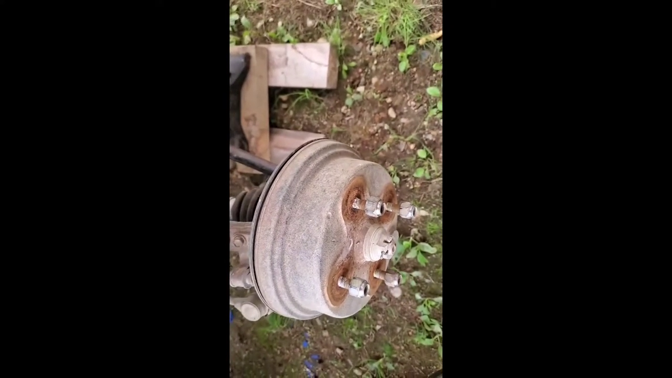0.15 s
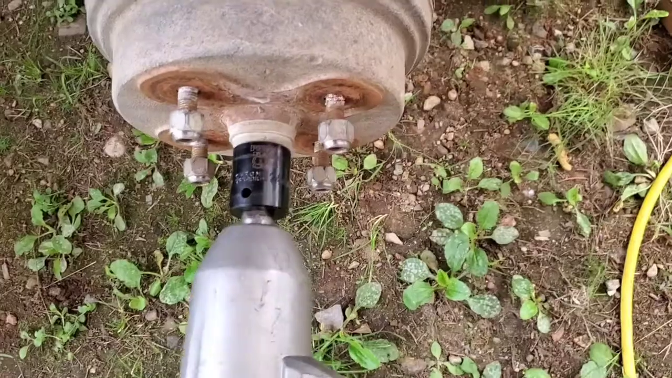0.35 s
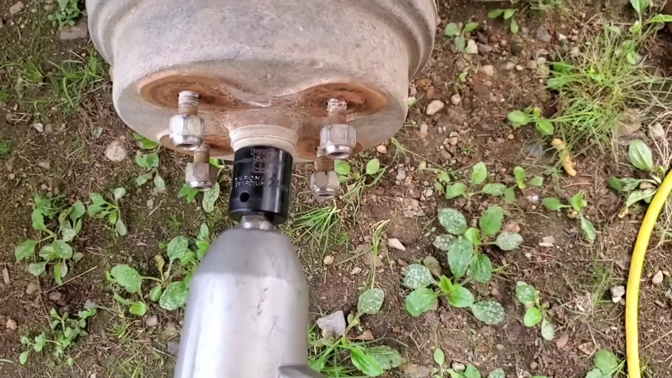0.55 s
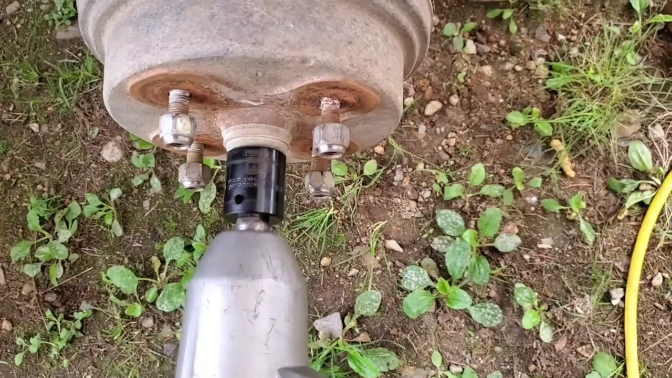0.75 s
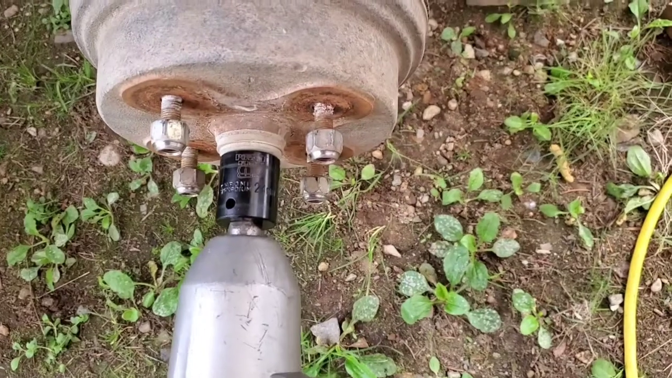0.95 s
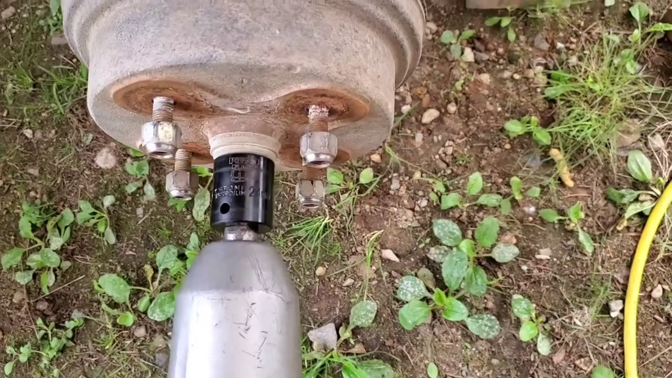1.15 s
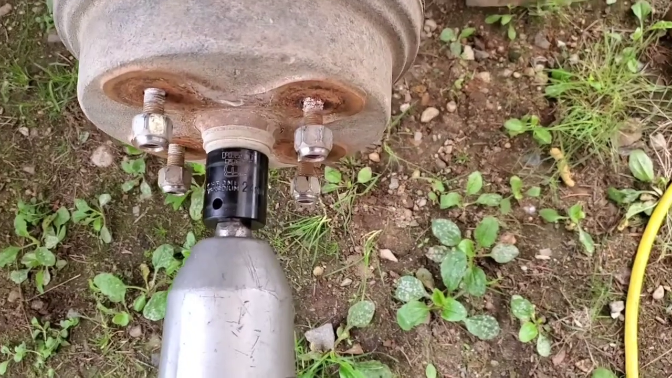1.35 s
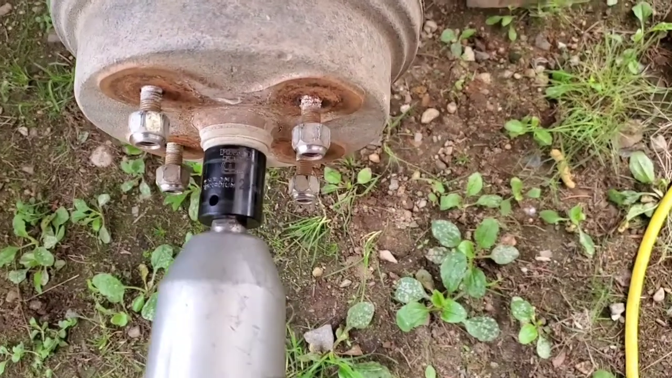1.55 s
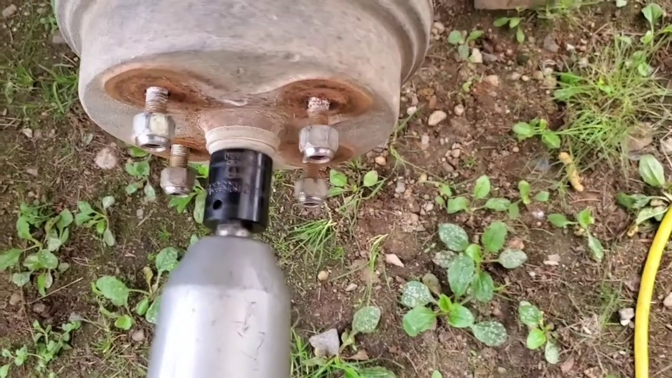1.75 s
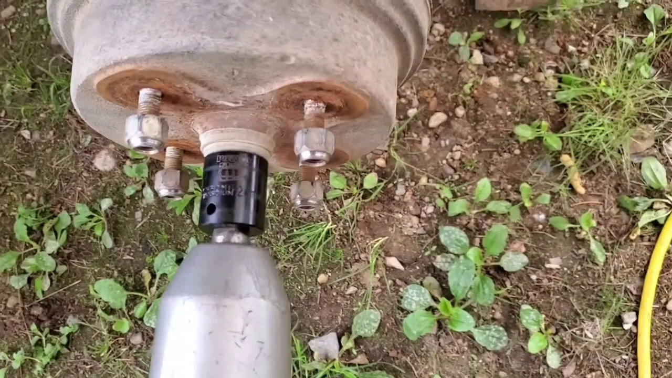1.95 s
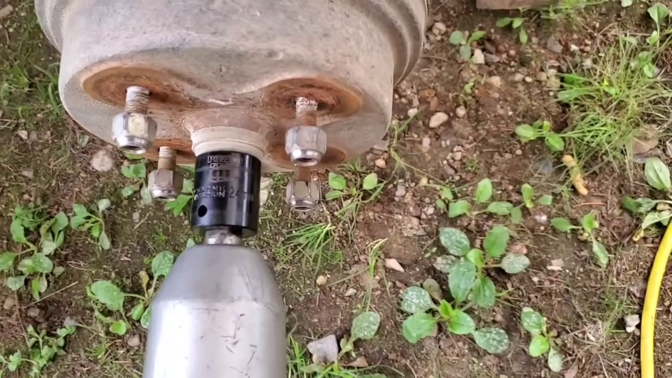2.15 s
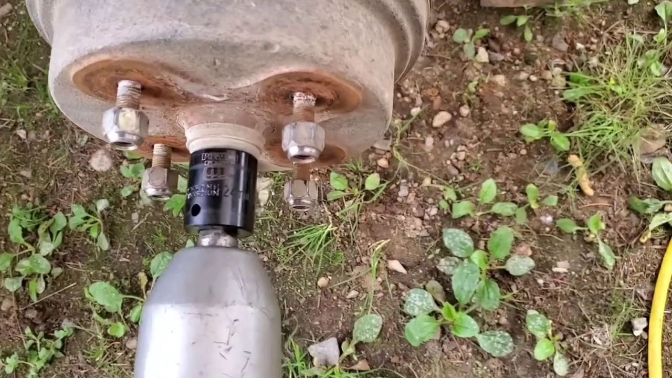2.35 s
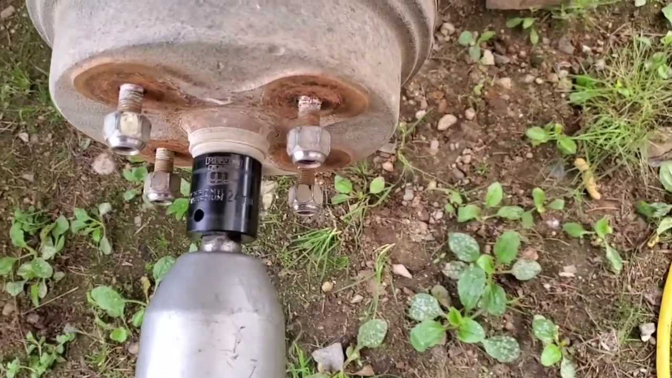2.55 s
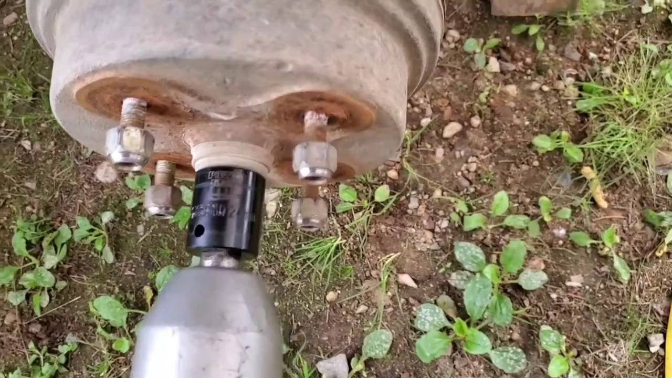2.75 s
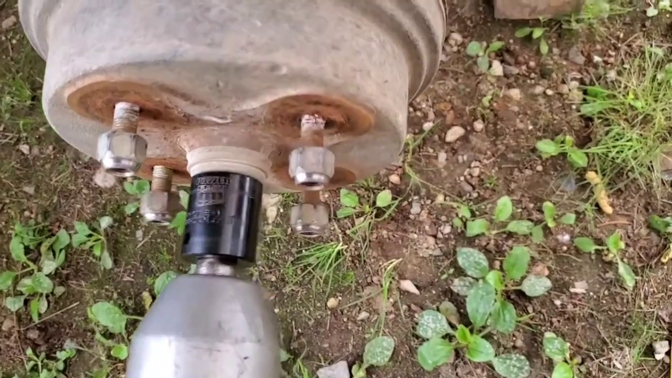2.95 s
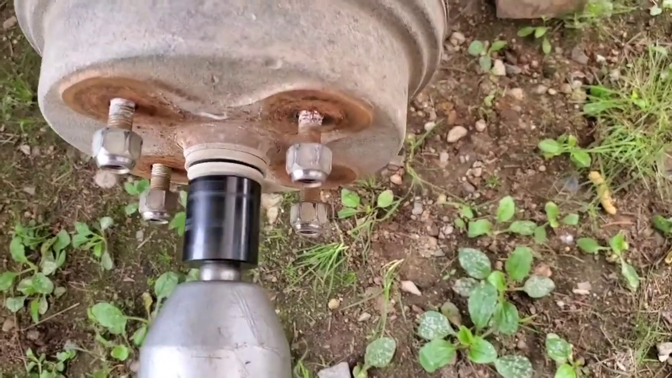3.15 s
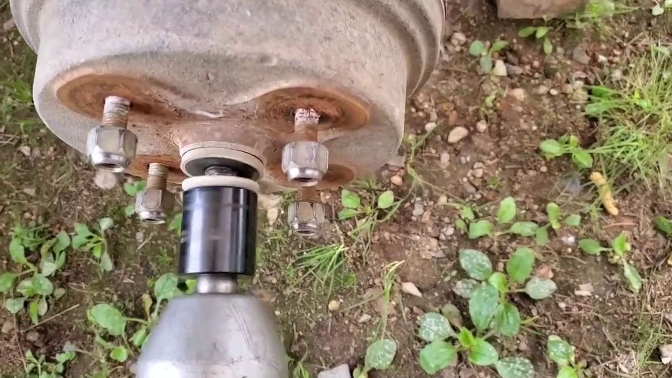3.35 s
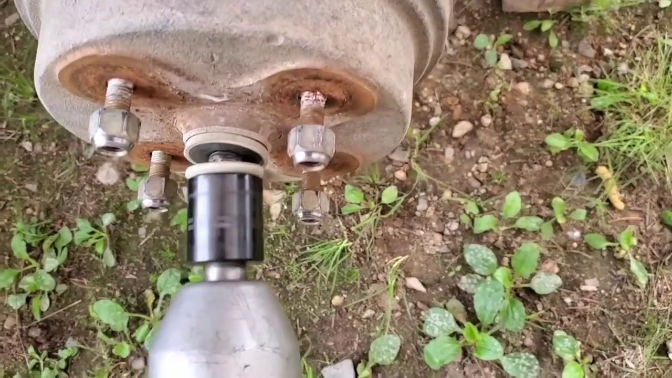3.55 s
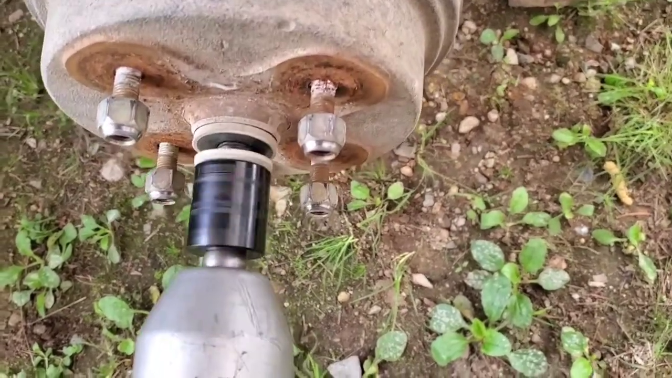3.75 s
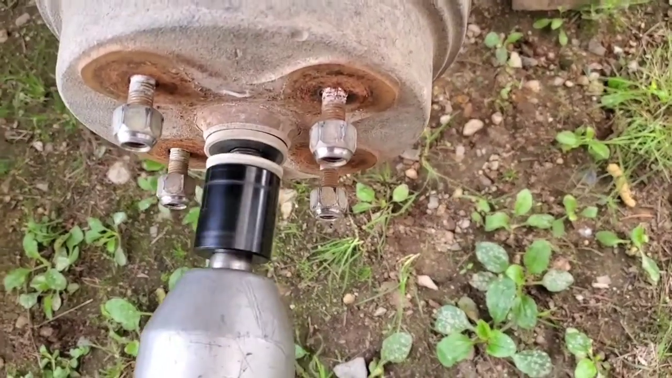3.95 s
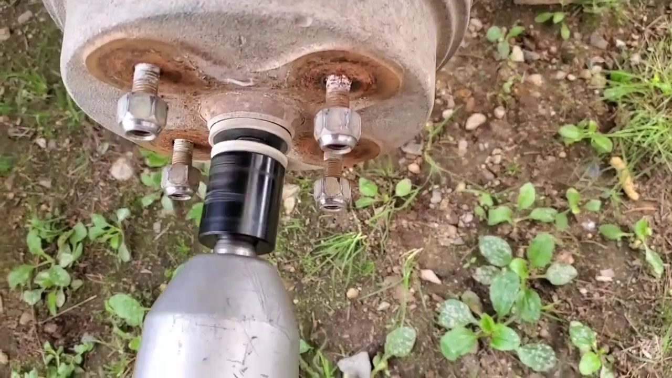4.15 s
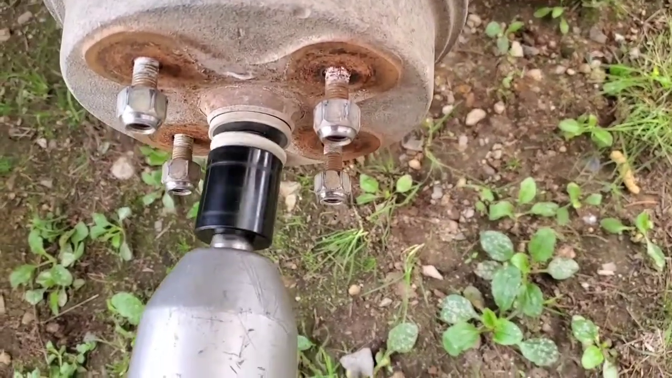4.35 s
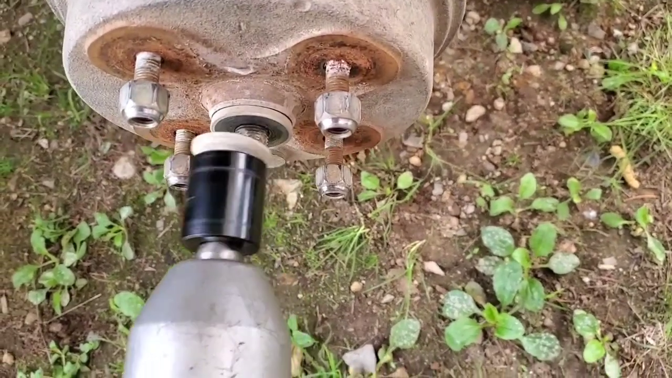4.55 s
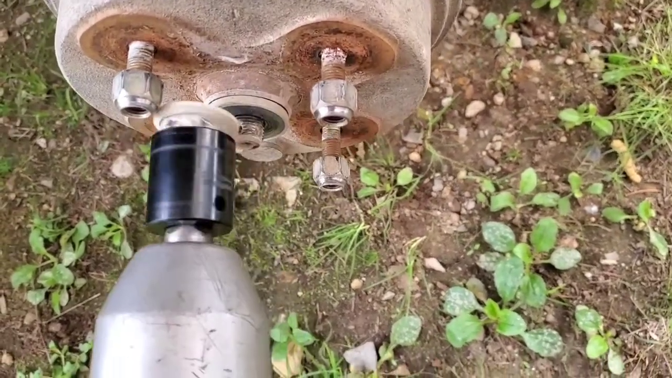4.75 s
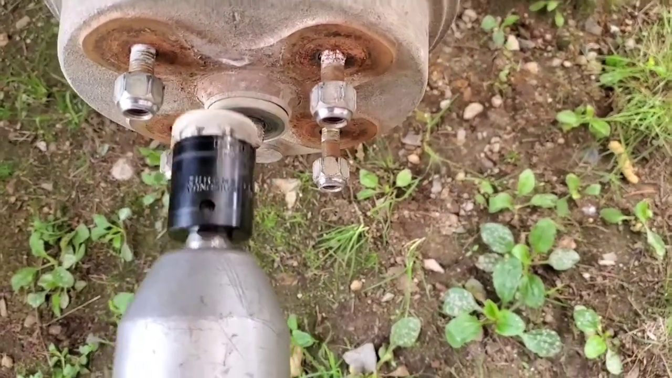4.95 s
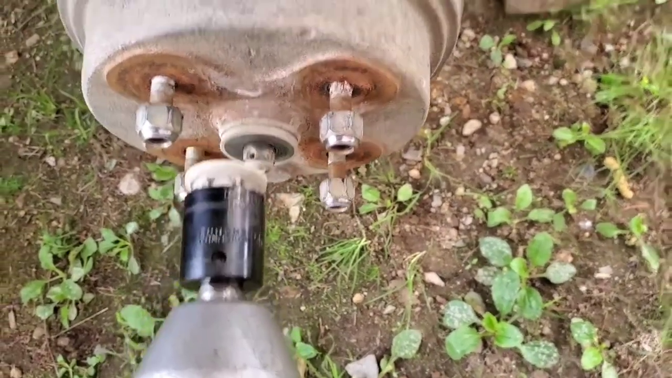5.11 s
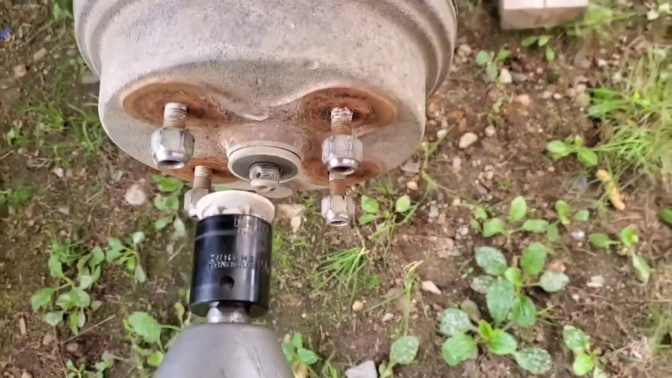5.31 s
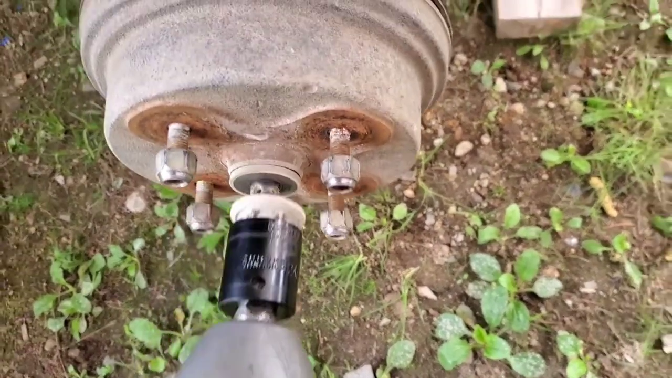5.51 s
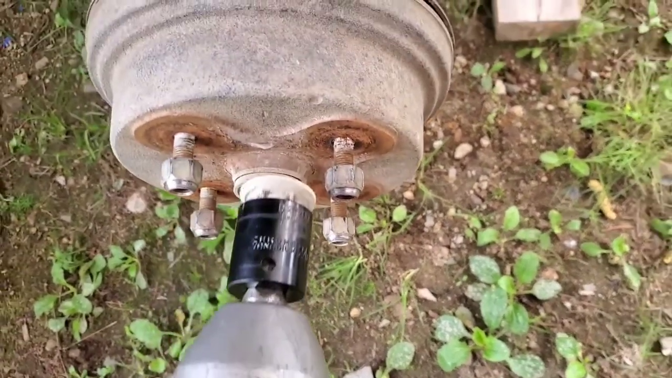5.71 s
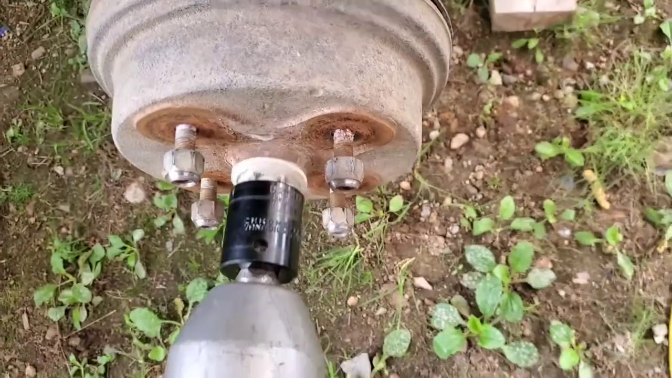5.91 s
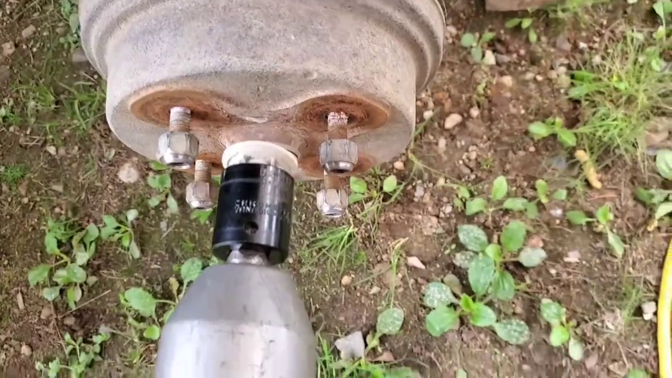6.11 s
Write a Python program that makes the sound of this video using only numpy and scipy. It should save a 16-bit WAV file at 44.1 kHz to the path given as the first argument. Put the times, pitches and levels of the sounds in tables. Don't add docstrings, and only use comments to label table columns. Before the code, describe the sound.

Faint low engine rumble in a yard cuts out briefly, then a power wrench an arm's length from the microphone rattles loudly against steel, three times with short pauses. The blows are hard, bright and uneven, ringing the hub. Finally the gears whine freely upward, wind down into slow tooth clicks and a brush scrape, and low background noise swells back. The tool leans slightly left in stereo.

```python
import sys
import numpy as np
from scipy import signal
from scipy.fft import rfft, irfft, next_fast_len
from scipy.io import wavfile
from scipy.ndimage import uniform_filter1d

SR = 44100
rng = np.random.default_rng(int(sys.argv[2]) if len(sys.argv) > 2 else 0)


def log_audio(samples):
    frames = np.atleast_2d(samples).T
    limited = np.clip(frames, -1, 1)
    pcm = np.round(limited * 32767).astype(np.int16)
    wavfile.write(sys.argv[1], SR, pcm)


def gain_from_db(level_db):
    decades = np.asarray(level_db, float) / 20
    return 10 ** decades


N = 276759
T = np.arange(N) / SR
LEFT_RIGHT = np.array([[.5], [-.5]])
CHANGE_S, RESUME_S, END_S = .301, .389, 6.262

# start in seconds, crack in dB, knock minus crack in dB.
BLOWS_1 = [(.441, -20, 5.5), (.4885, -17.5, -4), (.5117, -13, 2), (.5207, -18, 3), (.5301, -13.5, -14.5),
           (.5498, -19.5, -6), (.5554, -18, -3), (.5611, -10, -11), (.5833, -19, -5), (.5926, -14.5, -6),
           (.6211, -12.5, -3.5), (.6491, -9, -6), (.6768, -13, -9), (.7052, -9, -8), (.7385, -9.5, -8.5),
           (.7675, -15.5, -2), (.7743, -8.5, -12), (.822, -14, -9), (.8379, -13.5, -15), (.8556, -16.5, -1),
           (.8675, -11, -7.5), (.8871, -15.5, -4), (.9166, -14.5, -2.5), (.9288, -13, -5),
           (.9518, -16, -1.5), (.998, -23, 4), (1.0142, -15, -4.5), (1.0433, -20.5, -2), (1.0905, -31, 6)]
BLOWS_2 = [(1.6803, -13, -4.5), (1.7256, -13, -4), (1.7515, -17.5, -1.5), (1.7605, -12.5, -8),
           (1.7899, -13.5, -5.5), (1.8115, -14.5, -7), (1.8187, -13.5, -8.5), (1.8469, -12, -5.5),
           (1.8737, -11.5, -1), (1.9002, -15, -8.5), (1.9262, -12.5, -5), (1.9534, -13, -10),
           (1.9812, -10, -5.5), (2.0115, -9, -5.5), (2.0396, -17, -1), (2.0474, -13, -5),
           (2.0648, -15.5, -4), (2.0887, -11.5, -4.5), (2.1074, -16.5, -9.5), (2.1268, -16, -4),
           (2.1365, -15, -7), (2.1566, -17, -6), (2.1826, -15, -1.5), (2.1945, -17.5, -2.5),
           (2.2148, -22.5, -5), (2.2598, -24, -2.5), (2.2786, -18.5, -3.5), (2.3027, -17.5, -3.5),
           (2.3408, -32, 7.5)]
BLOWS_3 = [(2.7294, -17, -2.5), (2.7505, -18, -9), (2.7736, -18, 0.5), (2.7847, -14.5, -5.5),
           (2.8039, -17.5, -2.5), (2.8119, -18, -14), (2.8214, -14.5, -7), (2.844, -12.5, -5.5),
           (2.8516, -14, -2.5), (2.8789, -13, -10.5), (2.9052, -12.5, -3.5), (2.9328, -10.5, -5),
           (2.9588, -14.5, -7.5), (2.9841, -14, -3.5), (3.0091, -10.5, -10.5), (3.0329, -12, -7.5),
           (3.0585, -9.5, -11.5), (3.0826, -13.5, -3.5), (3.1067, -15.5, -6), (3.1307, -14, -6.5),
           (3.1555, -16, -11.5)]
BLOWS = BLOWS_1 + BLOWS_2 + BLOWS_3
# start in seconds, crack in dB.
RATTLES = [(0.4358, -26.5), (.4744, -23), (.6982, -22), (0.7267, -24), (.7317, -20.5), (.7582, -20),
           (.7929, -20.5), (.8095, -22), (0.882, -29), (.9038, -31.5), (.968, -25), (0.9887, -36.5),
           (1.0195, -22), (1.0352, -32.5), (1.0861, -40), (1.126, -50), (1.6704, -34), (1.6957, -20.5),
           (1.7164, -18.5), (1.782, -20), (1.9719, -19.5), (2.002, -21), (2.006, -22), (2.0305, -19),
           (2.119, -19), (2.2299, -26), (2.2679, -31), (2.3528, -35.5), (2.7232, -30), (2.7646, -25.5),
           (2.8361, -20.5), (2.8705, -22), (2.8909, -22.5), (3.2153, -31)]
# centre in seconds, spread in seconds, thump gain in dB.
SHAKES = [
    (.69, .06, 5),
    (1.9, 0.091, 6.5),
    (3.05, 0.082, 9),
]
# frequency in Hz, density in dB per Hz.
STEEL = [(35, -34), (60, -1.5), (92, -2), (130, -8), (350, -11), (675, -6.5), (1430, -3.5), (1610, -5.5),
         (1940, -0.5), (4530, -7), (6010, 0), (7250, 8.5), (8150, -10), (15000, -4), (16500, -5)]
# frequency in Hz, density in dB per Hz.
SPIKE = [(600, -6), (2000, 0), (6000, 0), (9000, -2), (13000, 1), (16500, 0)]
# frequency in Hz, level in dB, decay t60 in seconds.
SOCKET = [(2360, -18.5, 0.031), (4860, -10.5, .03), (5255, -6, .02), (5920, -5, 0.013), (6170, -8, .02),
          (6950, -7, .02), (7300, -8, 0.025)]
# frequency in Hz, level in dB, decay t60 in seconds.
DRUM = [(184, -5, .9), (245, -6, 1.6), (271, -13, .7), (389, -12, .8), (412, -14, .9), (475, 0, .6),
        (499, 2, .6), (575, -10, .9), (743, -13, .9), (773, -22, 3.0), (877, -4, .6), (925, -8, .8),
        (941, -6, .6)]
# time in seconds, rate in Hz.
MESH = [(.43, 300), (.6, 620), (.9, 620), (1.4, 200), (1.85, 640), (2.15, 640), (2.6, 250), (2.9, 670),
        (3.15, 735), (3.22, 797), (3.41, 905), (3.5, 783), (3.6, 668), (3.9, 482), (4.1, 361), (4.35, 250),
        (4.62, 148), (5.0, 35)]
# time in seconds, level in dB.
PULLS = [
    [(.38, -110), (.4, -77.5), (.428, -80), (.45, -27.5), (.55, -31), (.8, -33.5), (1.07, -47.5),
     (1.14, -65.5), (1.26, -93)],
    [(1.62, -99.5), (1.65, -51.5), (1.69, -32), (1.99, -29), (2.14, -31.5), (2.29, -38), (2.34, -50.5),
     (2.4, -62.5), (2.55, -92)],
    [(2.685, -97), (2.715, -47), (2.75, -31.5), (2.815, -33), (3.04, -28.5), (3.18, -33), (3.25, -29),
     (3.31, -32), (3.43, -28.5)],
    [(3.55, -32), (3.9, -35), (3.98, -36), (4.1, -36.5), (4.33, -41), (4.58, -38), (4.8, -44), (5.0, -55),
     (5.25, -90)],
]
# centre in seconds, spread in seconds, level change in dB.
SNAGS = [
    (3.2, .02, -2),
    (3.94, .012, -6),
    (4.255, .012, -3),
]
# frequency in Hz, density in dB per Hz.
CASE = [(150, -19), (560, -18), (770, -4), (950, -6.5), (1620, -7), (2050, -3.5), (2320, 0.5), (2700, -6),
        (4420, -10.5), (5800, -9.5), (7200, -9), (8200, -24.5)]
# frequency in Hz, density in dB per Hz.
FAN = [(7000, -15), (9300, -8), (10200, -15.5), (11300, -6), (13300, -2), (14000, -2.5), (15300, -2)]
# centre in Hz, width in Hz, gain in dB.
HOUSING = [(660, 130, -3), (960, 80, -2), (1120, 90, 2), (1650, 250, -1.5), (2300, 160, 1), (3550, 250, -2),
           (4420, 110, -4), (4700, 120, 2.5), (6800, 250, -2.5), (7250, 120, 2), (8500, 180, -3),
           (10250, 250, -3.5), (11400, 250, 1.5), (12100, 250, -2.5), (13400, 300, 2.5), (14100, 300, -4),
           (15300, 250, 4)]
# multiple of the mesh rate, level in dB.
WHINE = [(.3, 6), (1, 2), (2, 1), (3, 1.5)]
# multiple of the mesh rate, level in dB.
OVERTONES = [(4, 0), (5, 0), (6, 1)]
# multiple of the mesh rate, level in dB.
BRUSHES = [(3.4, 2), (6.58, 0)]
# frequency in Hz, gain in dB.
GEARBOX = [(190, -33), (250, -25), (450, -25), (620, -17), (710, -6), (785, -1), (860, -6), (930, -9),
           (1200, -1), (1500, -8), (2000, -12), (2400, -1), (2950, -2), (3300, -12), (5600, -5)]
# frequency in Hz, density in dB per Hz.
SCRAPE_TONE = [(3000, -14), (4300, -12), (5200, -4), (5800, -7), (6600, 0.5), (7400, -6), (9500, -19),
               (12500, -11)]
# start in seconds, level in dB.
TICKS = [(.264, -69), (.296, -73), (.392, -60.5), (1.630, -49.5), (2.696, -48), (2.711, -40.5), (5.03, -46),
         (5.081, -56), (5.45, -66)]
# start in seconds, level in dB.
BUMPS = [(4.05, -45), (4.16, -44)]
# start in seconds, level in dB.
ANVIL = [(3.7396, -36), (3.8104, -35), (3.9197, -37), (3.9566, -40), (3.975, -41), (4.012, -41),
         (4.052, -41), (4.1816, -38), (4.196, -43), (4.2295, -44), (4.258, -45), (4.2724, -43),
         (4.283, -44), (4.423, -44), (4.455, -45), (4.47, -41), (4.516, -43), (4.533, -46), (4.5672, -47),
         (4.6111, -46), (4.6914, -47)]
# time in seconds, rumble in dB.
GAIN = [(0, -59), (.03, -54), (.43, -53), (1.1, -64), (1.25, -76.5), (1.62, -79), (2.7, -75.5), (3.4, -67),
        (4.5, -61), (5.0, -55.5), (5.2, -53.5), (5.33, -50), (5.95, -46.5), (6.28, -48)]
# frequency in Hz, density in dB per Hz.
YARD = [(90, 3), (135, 2), (175, -13), (300, -23.5), (500, -18.5), (860, -25.5), (950, -44), (2200, -43),
        (5900, -52), (6600, -41), (7300, -56), (14000, -46)]
# frequency in Hz, density in dB per Hz.
ROAD = [(90, -4.5), (215, -6), (305, -11.5), (560, -20), (720, -13), (1030, -16.5), (1800, -23),
        (3080, -43), (5900, -67), (6600, -37), (7300, -69), (14000, -47)]
# multiple of 120 Hz, level in dB against the rumble.
MAINS = [(3, -35), (4, -27), (5, -29), (6, -31), (7, -37)]
# frequency in Hz, level in dB.
WIDE_BLOW = [(60, 2), (110, 0), (200, -1.5), (380, -1.5), (700, -6), (1290, -5), (2380, -6), (4400, 1),
             (8120, -2.5), (15000, 0.5)]
WIDE_MOTOR = [(60, -9), (110, -5.5), (200, -13), (380, -9), (700, -15.5), (1290, -6.5), (2380, 0.5),
              (4400, 2), (8120, -0.5), (15000, -0.5)]
WIDE_YARD = [(60, -14), (200, -10), (400, -8), (1300, 1.5)]
# frequency in Hz, left minus right in dB.
LEAN = [(60, 2.5), (110, 6.5), (200, 2.5), (380, 2), (700, 0.5), (1290, 2.5), (2380, 5.5), (4400, 0),
        (8120, 4), (15000, 4.0)]
# frequency in Hz, left minus right in dB.
HUB_LEAN = [(60, 2.5), (300, 3), (700, 2), (2400, -1), (5000, 1.5), (9000, -6), (14000, 1)]


def hammer():
    size = 4096
    out, t = np.zeros((2, N + size)), np.arange(size) / SR
    crack_tail = 1.34 * np.exp(-t / .00082) + .62 * np.exp(-t / .0031) + .19 * np.exp(-t / .011)
    crack = (1 - np.exp(-t / .00037)) ** 2 * crack_tail
    knock = (1 - np.exp(-t / .00082)) ** 2 * (np.exp(-t / .0019) + .25 * np.exp(-t / .016))
    thump = (1 - np.exp(-t / .002)) * np.exp(-t / .0097)
    spike = (1 - np.exp(-t / .0002)) ** 2 * np.exp(-t / .0007)
    bands_hz = np.geomspace(60, 16500, 24)
    steel_hz, steel_db = np.transpose(STEEL)
    band_db = np.interp(np.log(bands_hz), np.log(steel_hz), steel_db)
    for s, crack_db, knock_db, thump_db in contacts():
        tint = np.c_[bands_hz, band_db + 2.4 * rng.standard_normal(24)]
        grit_db = 2.9 * np.repeat(rng.standard_normal(size // 16), 16)
        noise = pair(size, WIDE_BLOW) * gain_from_db(grit_db)
        blow = gain_from_db(-.3) * crack * colour(noise, tint, lo_hz=3950)
        blow += gain_from_db(knock_db - .3) * knock * colour(noise, tint, lo_hz=500, hi_hz=3150)
        blow += gain_from_db(-4.5) * spike * colour(noise, SPIKE)
        blow += gain_from_db(thump_db + 1) * thump * colour(noise, tint, lo_hz=56.3, hi_hz=447)
        pan_db = np.clip(-.4 * (crack_db + 14.5), -2.5, 2.5) + 1.6 * rng.standard_normal()
        i = int(s * SR) - 20
        out[:, i:i + size] += gain_from_db(crack_db + pan_db * LEFT_RIGHT) * blow
    out = out[:, :N]
    return out + gain_from_db(-34) * ring(out, SOCKET) + gain_from_db(-27.5) * drum(out)


def contacts():
    hard_db = -12.5
    rattles = [(s, db, -7 + (1 - .45) * (hard_db - db)) for s, db in RATTLES]
    s, crack_db, knock_db = np.transpose(BLOWS + rattles)
    shake_db = sum(gain_db * np.exp(-((s - at) / spread) ** 2) for at, spread, gain_db in SHAKES)
    thump_db = -26 + (1 - .62) * (hard_db - crack_db) + shake_db
    thump_db = thump_db + 2 * rng.standard_normal(len(s))
    return np.c_[s, crack_db, knock_db, thump_db]


def drum(blows):
    power, out = np.mean(blows ** 2, axis=0), 0
    for hz, db, t60 in DRUM:
        loss = np.exp(-2 * np.log(1000) / (t60 * SR))
        stored = signal.lfilter([1], [1, -loss], power) / (t60 * SR)
        wavering = unit(ring(pair(N, WIDE_YARD), [(hz, 0, .35)]))
        out = out + gain_from_db(db) * np.sqrt(stored) * wavering
    return out


def motor():
    hz = curve([MESH]) * (1 + .004 * walk(40))
    speed, turns = np.log10(hz / 700), np.cumsum(hz) / SR
    effort_db = curve(PULLS) + sum(db * np.exp(-((T - s) / w) ** 2) for s, w, db in SNAGS)
    slow = .65 * np.clip(1.3 - hz / 300, 0, 1) * np.clip(hz / 45, 0, 1) ** 2
    noise = case_noise(hz, speed, turns, slow)
    return gain_from_db(effort_db) * (housing(noise) + gear_whine(hz, speed, turns)) + brush_scrape(turns, slow)


def case_noise(hz, speed, turns, slow):
    free = windup()
    clicks = (rng.random(N) < 500 / SR) * gain_from_db(3.6 * np.minimum(rng.exponential(size=N), 3))
    chatter = unit(decay(clicks, .0012))
    rotation = 1 + .091 * np.cos(2 * np.pi * turns / 24)
    grain = (.8 + .35 * chatter) * rotation * pair(N, WIDE_MOTOR)
    fan = gain_from_db(6 * np.log10(hz / 800) + .8 * walk(19)) * colour(grain, FAN, lo_hz=7800)
    treble = unit(colour(grain, CASE, lo_hz=3672, hi_hz=7800) + 1.4 * fan)
    treble = treble * gain_from_db(walk(25) - 6.5 * free) * gain_from_db(1.5 + 14 * speed)
    teeth = beat(turns, slow) * gain_from_db(1.8 * slow * walk(60))
    middle = colour(grain * teeth, CASE, lo_hz=620, hi_hz=1500)
    middle = middle + .33 * gain_from_db(10 * speed) * colour(grain, CASE, hi_hz=620)
    middle = middle + 1.3 * colour(grain * np.sqrt(teeth), CASE, lo_hz=1500, hi_hz=3400)
    return treble + unit(middle) * gain_from_db(.7 * walk(30) - 3 * free)


def windup():
    free = np.zeros(N)
    for s, crack_db, _ in BLOWS:
        free[int((s - .009) * SR):int(s * SR)] = crack_db > -18
    return uniform_filter1d(free, 130)


def gear_whine(hz, speed, turns):
    def tones(orders):
        return sum(gain_from_db(db + 2 * walk(16)) * np.sin(2 * np.pi * k * turns) for k, db in orders)

    held = np.clip((2.9 + .098 - T) / .2, 0, 1)
    level_db = -7 + 5 * speed - 9 * held
    level_db += 6 * np.exp(-((T - 3.495) / .035) ** 2)
    sharp = np.clip(2 - hz / 420 * 1.5, 0, 1)
    powered = T < 3.46
    whine = tones(WHINE) + sharp * tones(OVERTONES) + powered * tones(BRUSHES)
    return gain_from_db(level_db) * shape(whine, GEARBOX)


def brush_scrape(turns, slow):
    start, peak, end = 4.5, 4.73, 4.87
    level_db = -43 - 14 * np.clip((peak - T) / (peak - start), 0, 9) - 170 * np.maximum(T - end, 0)
    segments = beat(BRUSHES[0][0] * turns, .55 * slow)
    scrape = gain_from_db(level_db) * colour(segments * pair(N, WIDE_MOTOR), SCRAPE_TONE)
    rub = colour(pair(N, WIDE_MOTOR), SCRAPE_TONE, lo_hz=4700, hi_hz=6500)
    return scrape + gain_from_db(-83 - 130 * np.maximum(T - 5.18, 0)) * (T > peak) * rub


def housing(x):
    return filtered(x, lambda hz: gain_from_db(sum(db * np.exp(-((hz - f) / w) ** 2) for f, w, db in HOUSING)))


def ticks():
    anvil = taps(ANVIL, .0012, [(2500, -14), (5000, -6), (9000, -4), (13000, 0), (15500, 0)])
    clicks = taps(TICKS, .0023, [(400, -9), (1500, -4), (4500, -13), (9000, -28)])
    bumps = taps(BUMPS, .03, [(60, -17.5), (95, -5), (140, -17), (250, -37)])
    return anvil + clicks + bumps


def taps(events, fade_s, table):
    out = np.zeros(N)
    for s, db in events:
        out[int(s * SR)] = gain_from_db(db)
    return colour(decay(out, fade_s) * pair(N, WIDE_MOTOR), table)


def yard():
    gain_db, late = curve([GAIN]), T > 4
    engine = [(25, -28), (40, -18.5), (51, -8), (55, 6), (60, -.5), (85, -12), (130, -12), (200, -60.5)]  # Hz, dB
    firing = gain_from_db(1.1 * walk(9.9)) * np.sin(2 * np.pi * np.cumsum(55.2 + .4 * walk(4.3)) / SR)
    rumble = gain_from_db(gain_db - 7 * (T < RESUME_S)) * (.51 * colour(pair(N, WIDE_YARD), engine) + 1.2 * firing)
    road, leaves = colour(pair(N, WIDE_YARD), ROAD), colour(pair(N, WIDE_YARD), YARD)
    rustle = np.where(late, road, leaves) * gain_from_db(gain_db + walk(10))
    road_db = -12.5 + 2.5 * (T - 5.8) - 25 * np.maximum(5.15 - T, 0)
    rustle = rustle * gain_from_db(np.where(late, road_db, -4))
    mains = sum(gain_from_db(db + 1.5 * walk(8)) * np.sin(2 * np.pi * k * 120 * T) for k, db in MAINS)
    mains = mains * np.sqrt(2) * gain_from_db(gain_db - 7 * (T > RESUME_S))
    return (rumble + rustle + mains) * gain_from_db(np.where(late, 0, 4.) * LEFT_RIGHT)


def ring(x, modes):
    out = 0
    for hz, db, t60 in modes:
        pole = np.exp(2j * np.pi * hz / SR - np.log(1000) / (t60 * SR))
        out = out + gain_from_db(db) * signal.lfilter([1], [1, -pole], x).imag
    return out


def beat(turns, depth):
    tick = np.exp(-(turns % 1) / .2)
    return 1 + depth * (tick / .26 - 1)


def decay(x, fade_s):
    return signal.lfilter([1], [1, -np.exp(-1 / (fade_s * SR))], x)


def walk(rate):
    k = int(SR / rate)
    steps = np.repeat(rng.standard_normal(N // k + 1), k)
    return unit(uniform_filter1d(steps, k)[:N])


def curve(tables):
    return np.interp(T, *np.vstack(tables).T)


def pair(size, wide):
    mid, side = rng.standard_normal((2, size))
    return mid + shape(side, wide) * 2 * LEFT_RIGHT


def lean(x, table):
    hz, db = np.transpose(table)
    return np.array([shape(x[0], np.c_[hz, db / 2]), shape(x[1], np.c_[hz, -db / 2])])


def colour(x, table, lo_hz=0., hi_hz=np.inf):
    f, db = np.transpose(table)

    def gain(hz):
        edges = np.sqrt((1 + (lo_hz / hz) ** 8) * (1 + (hz / hi_hz) ** 8))
        return unit(gain_from_db(np.interp(np.log(hz), np.log(f), db)) / edges)

    return filtered(x, gain)


def shape(x, table):
    f, db = np.transpose(table)
    return filtered(x, lambda hz: gain_from_db(np.interp(np.log(hz), np.log(f), db)))


def filtered(x, gain):
    n = next_fast_len(x.shape[-1] + 2048)
    return irfft(rfft(x, n) * gain(np.fft.rfftfreq(n, 1 / SR) + 1), n)[..., :x.shape[-1]]


def unit(x):
    return x / np.sqrt(np.mean(x ** 2))


def scene():
    tool = lean(hammer(), HUB_LEAN) + motor() + ticks()
    return lean(tool, LEAN) + yard()


def roll_off(x):
    return signal.sosfilt(signal.butter(12, 16950, fs=SR, output="sos"), x)


def record(dry):
    gate = uniform_filter1d(1. * ((T < CHANGE_S) | (T > RESUME_S)), 200)
    gate = gate * np.clip((N / SR - T) / (N / SR - END_S), 0, 1)
    band = [(25, -9), (45, 0), (15700, 0), (15900, -14), (16850, -17), (16950, -60)]  # Hz, dB
    full = shape(np.tanh(.94 * dry * gate) / .88, band)
    cut = shape(full, [(15750, 0), (15950, -50)])
    power = uniform_filter1d(np.mean(full ** 2, axis=0), 300)
    hard = np.clip(power / gain_from_db(-35) - .4, 0, 1)
    hard = uniform_filter1d(uniform_filter1d(hard, 300), 300)
    return roll_off(cut + hard * (full - cut))


dry = scene()
out = record(dry)
log_audio(out)
```